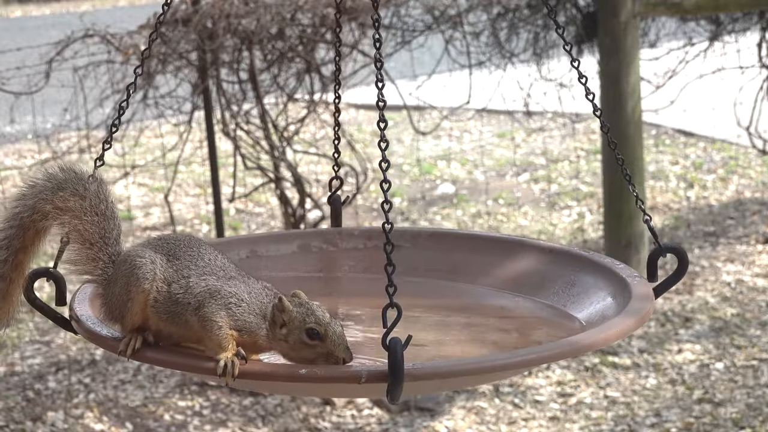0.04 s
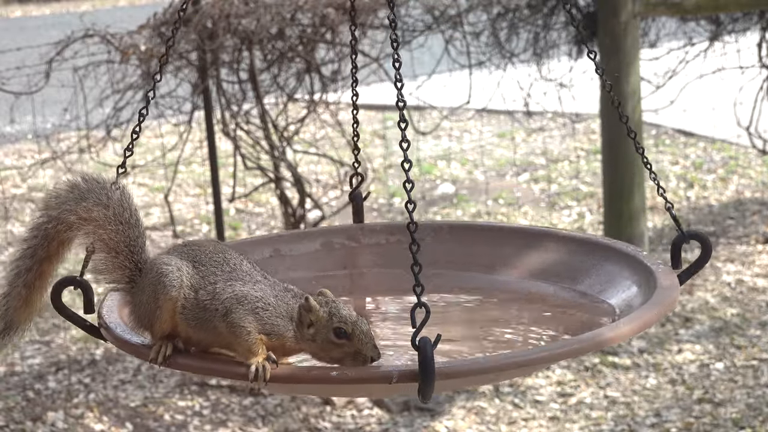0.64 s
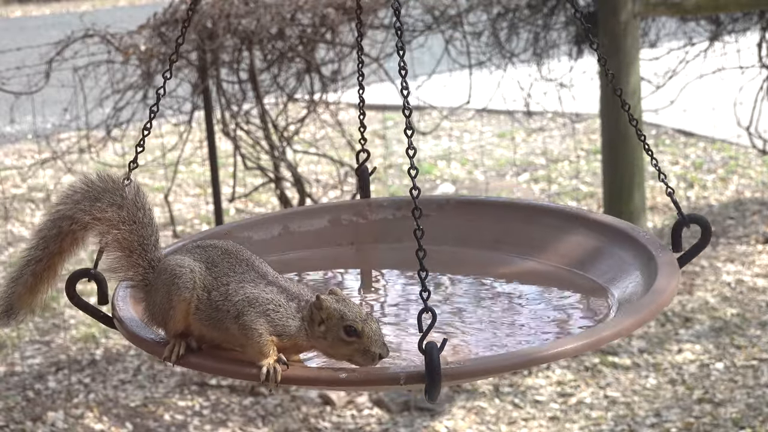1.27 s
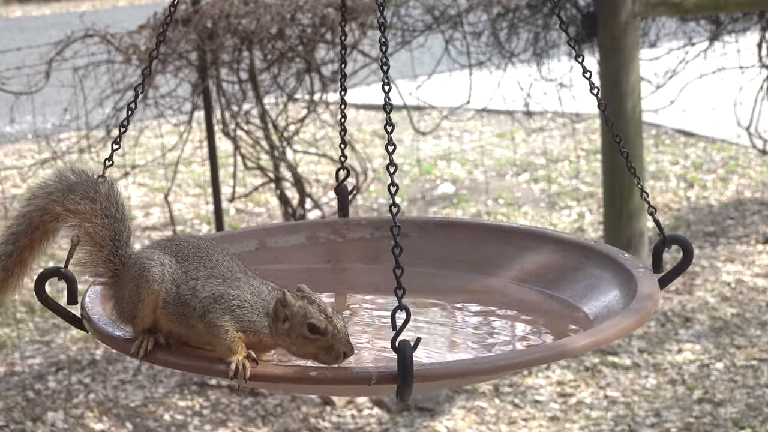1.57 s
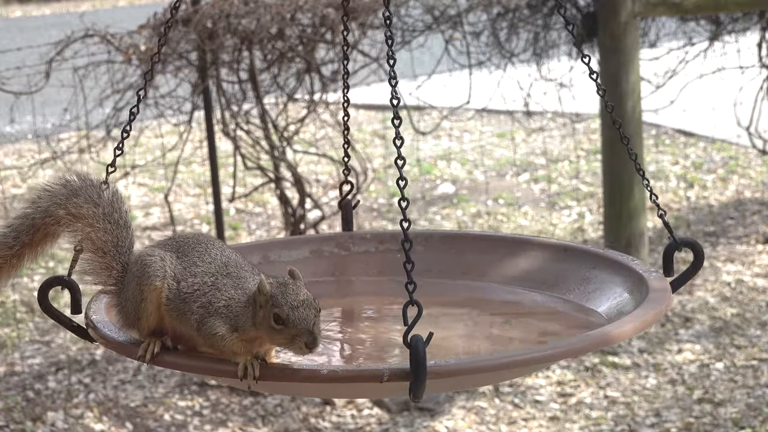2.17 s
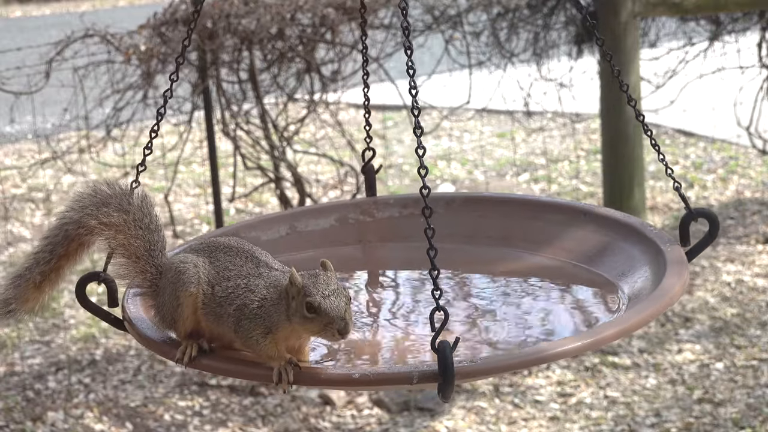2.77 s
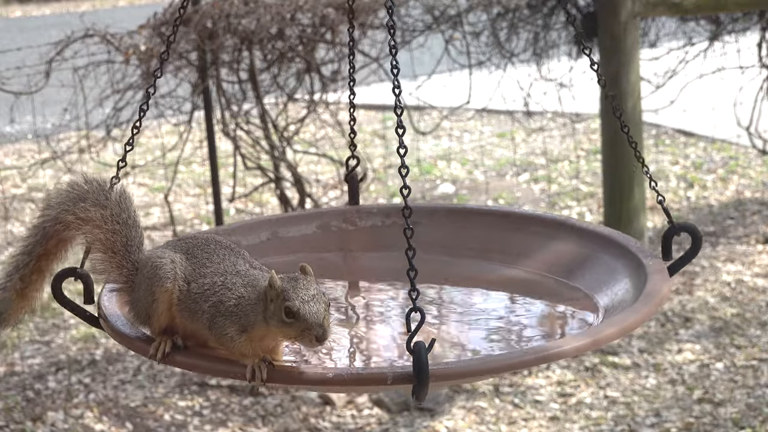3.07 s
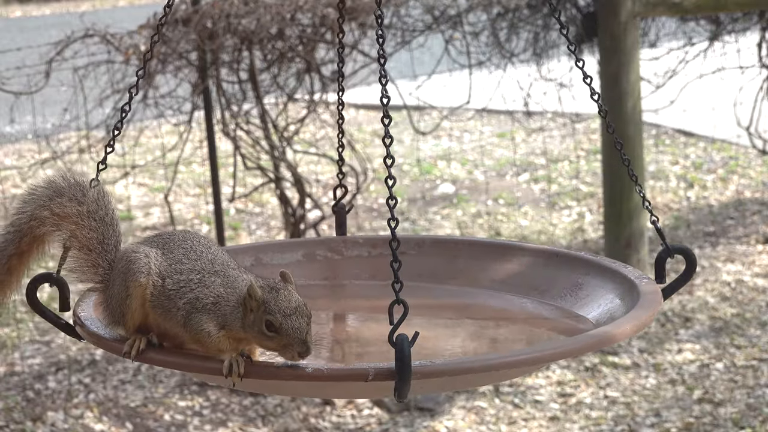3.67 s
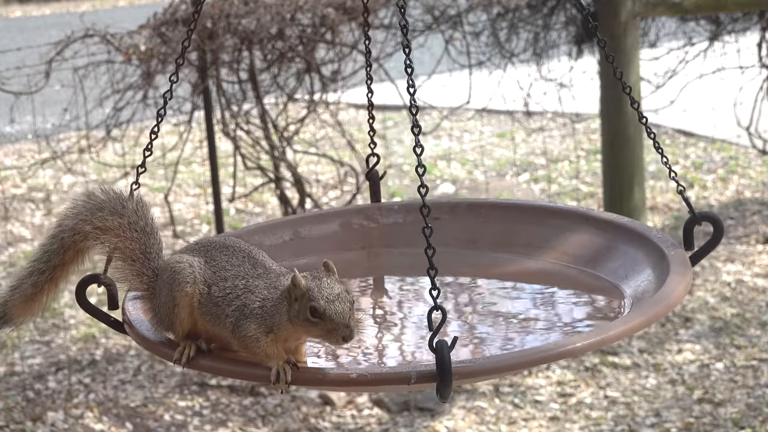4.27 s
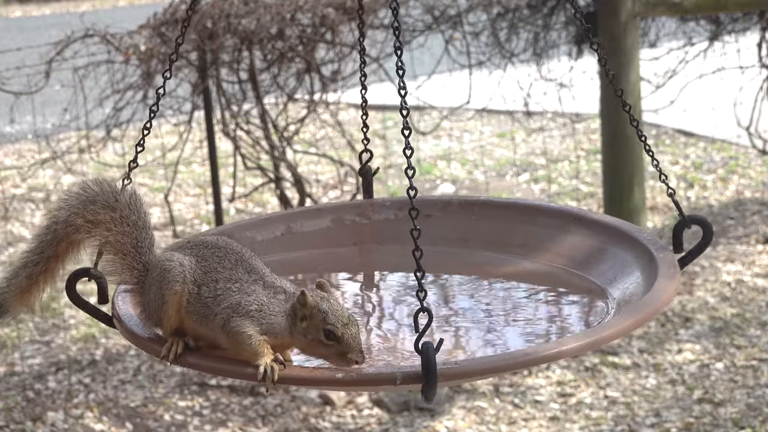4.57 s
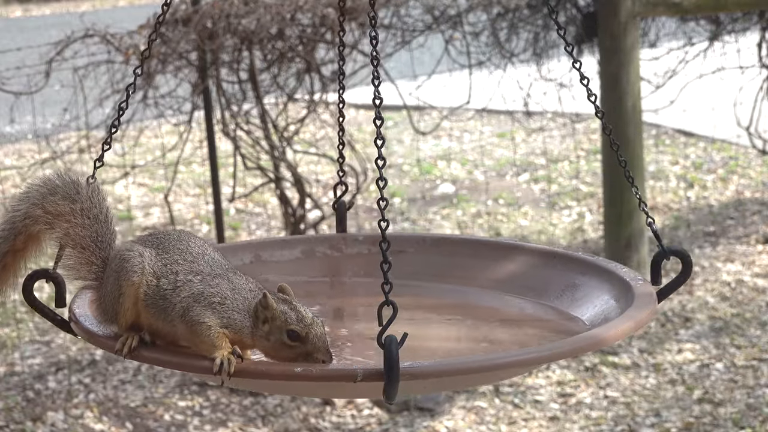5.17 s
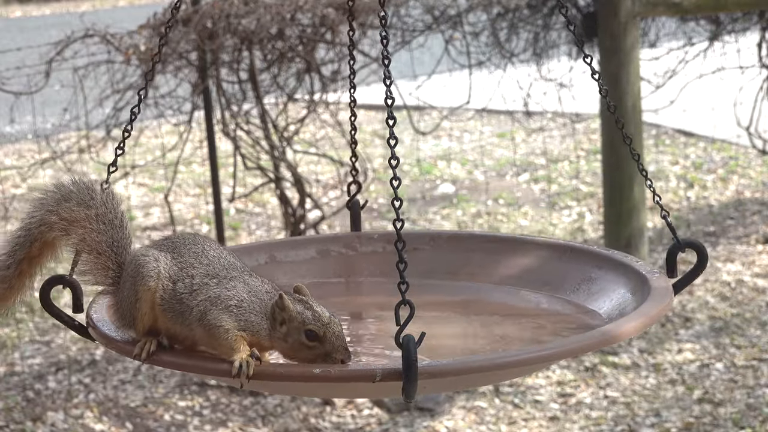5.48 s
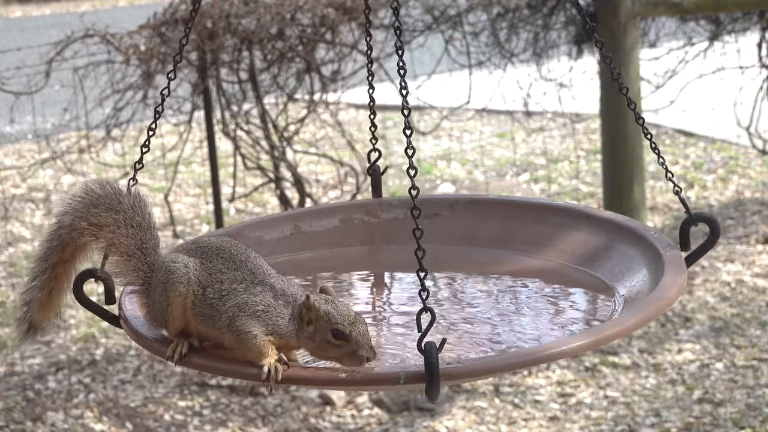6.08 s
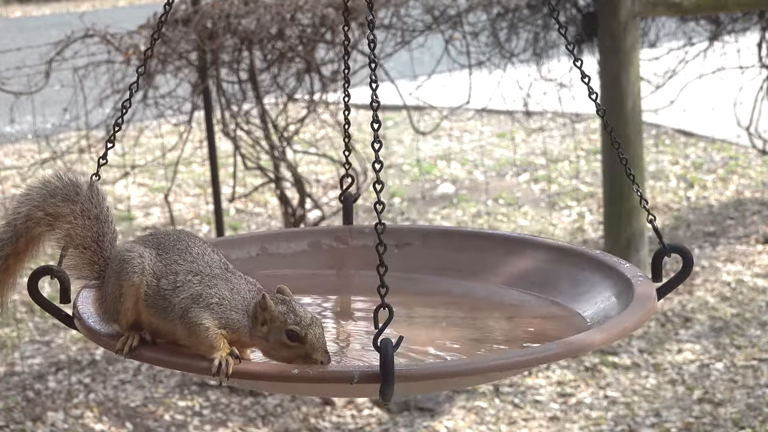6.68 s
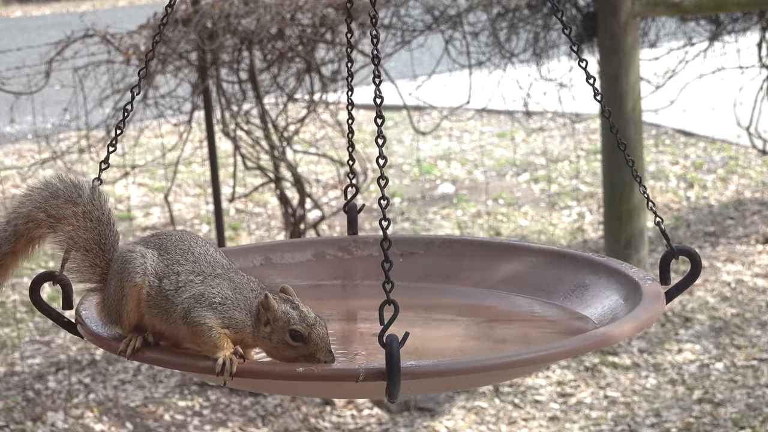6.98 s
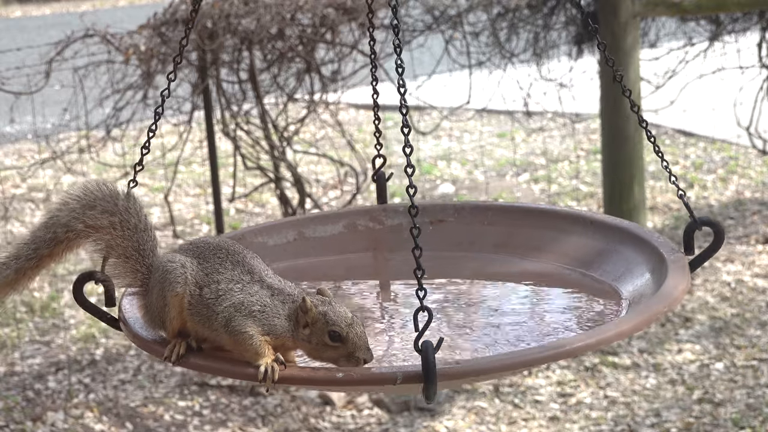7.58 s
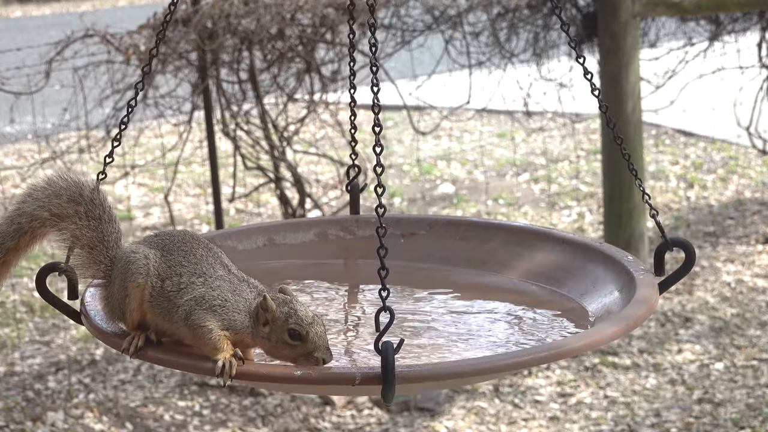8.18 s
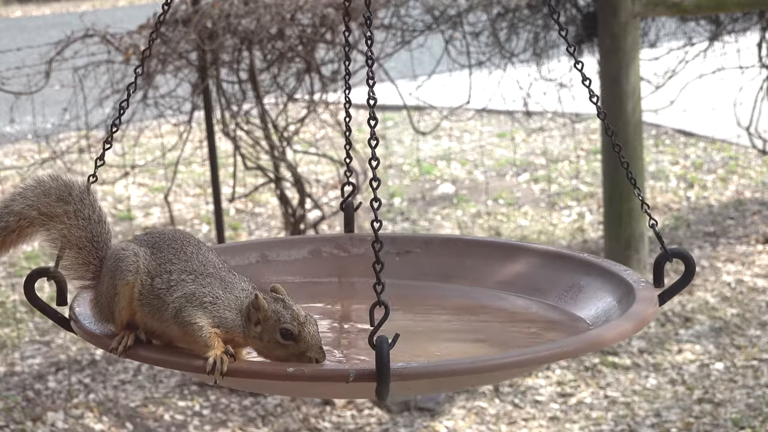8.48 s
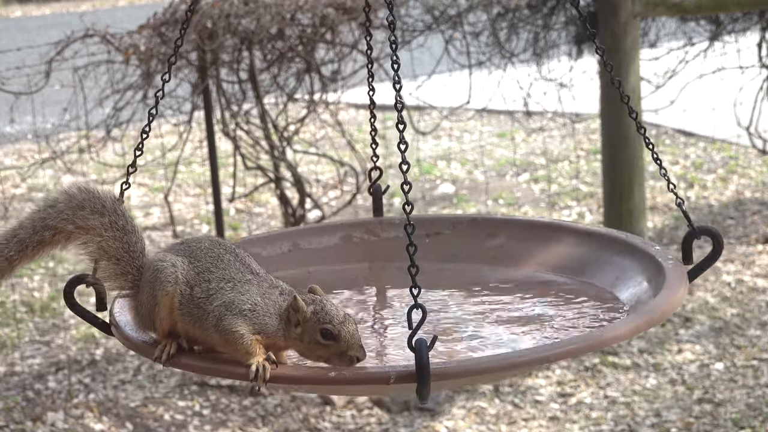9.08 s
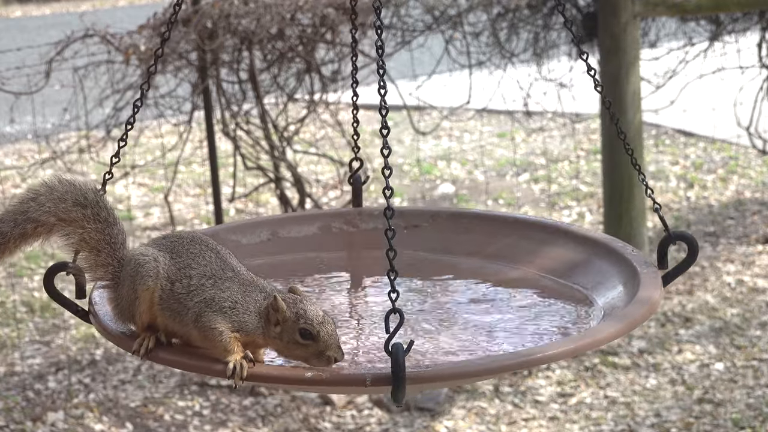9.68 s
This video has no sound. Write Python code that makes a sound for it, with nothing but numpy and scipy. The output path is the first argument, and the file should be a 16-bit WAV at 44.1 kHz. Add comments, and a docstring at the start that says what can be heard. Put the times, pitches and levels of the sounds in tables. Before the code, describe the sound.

A soft wash of distant roads and trees runs throughout this garden. From the start, a nearby songbird sings two falling whistles answered by rising notes, then a louder, faster run of them from 1 to 4 seconds, lightly echoing. Sparrows chirp at the start, around 2 and just after 4 seconds. A hanging water dish knocks dully near 1.3 seconds, and wind bumps the microphone between 2 and 3. From 4 to 8 seconds the song rests, leaving thin high whistles, faint far birds and a few tiny chain ticks, with a rising wheezy call near 6.5 to 7 seconds. A harder gust rumbles on the microphone from 7.4 to 8.7 seconds, with another dull knock around 8. The songbird resumes just after 8 seconds, joined by another bird's buzzy trill from 8.5 and sparrow chirps just before the end at 10.

```python
"""A breezy garden. Over a steady wash of roads and trees, a cardinal sings falling whistles answered by
rising notes, scattered by trunks and walls; sparrows chirp and a gust bumps the microphone.
From 4 s the song rests: thin high whistles, far birds, faint ticks of a hanging water dish, then a
finch's rising wheeze. After 7 s a harder gust hits. From 8 s the cardinal sings again, joined by
another bird's buzzy trill and, last, the sparrows."""
import sys
import numpy as np
from scipy import signal
from scipy.fft import rfft, irfft, next_fast_len
from scipy.io import wavfile
from scipy.ndimage import map_coordinates

SR = 44100
rng = np.random.default_rng(int(sys.argv[2]) if len(sys.argv) > 2 else 0)


def master(y):
    """Save y as 16-bit WAV."""
    cut = np.clip(np.atleast_2d(y).T, -1, 1)
    pcm = np.round(cut * 32767)  # scale
    wavfile.write(sys.argv[1], SR, pcm.astype(np.int16))


N = 438354
TOP_HZ = 15750

# Wash of roads and trees: time_s, level_db
AIR_LEVEL = [(0.0, -51.5), (3.24, -49.5), (4.18, -51), (9.94, -52)]
# Noise spectra: freq_hz, density_db
AIR_SPECTRUM = [(59, -14), (100, 3.5), (146, -6.5), (223, -3.5), (326, -7), (448, -6), (554, -5.5),
                (919, -3), (1070, -5.5), (1210, -9.5), (2190, -18), (5090, -22.5), (8450, -29.5),
                (12100, -30), (15600, -34.5)]
BUFFET_SPECTRUM = [(11, -28), (18, 0.5), (37, -2.5), (55, 1), (99, -8.5), (155, -20), (273, -47.5),
                   (300, -50), (390, -59), (660, -120)]
EDDY_SPECTRUM = [(40, -24), (110, -6.5), (200, -2), (400, -16.5), (800, -38), (2500, -90)]
HOARSE_SPECTRUM = [(1500, -25), (2400, -1.5), (3300, 2), (5500, 1), (9000, -23.5)]
BUZZ_SPECTRUM = [(2400, -24), (3600, -12), (5500, 1.5), (7000, -6), (9200, -22), (15000, -30)]
# Left-right likeness: freq_hz, correlation
AIR_COHERENCE = [(60, 0.99), (180, 1), (550, 0.59), (1650, 0.092), (4970, 0.13), (15000, 0.93)]
MONO = [(1, 1)]
# Distant traffic: centre_s, level_db, width_s, pitch_hz
DRONES = [(1.2, -63, 2.14, 480.7), (3.851, -60, 1.2, 295), (5.9, -62.5, 1.5, 478.4), (7.2, -58.5, 0.5, 447)]
# Breeze on the microphone: time_s, push_db
BREEZE = [(0, -52), (1.6, -46), (3.2, -52.5), (6.3, -52), (7.0, -47.5), (9.94, -42.5)]
# Single puffs: centre_s, push_db, width_s
PUFFS = [(0.766, -36, 0.022), (5.447, -36.5, 0.021), (9.742, -30.5, 0.055)]
# Gusts: time_s, push_db, eddy_db
FIRST_GUST = [(1.95, -50, -68), (2.064, -36, -67), (2.078, -32.5, -48.5), (2.442, -32, -55.5),
              (2.458, -39, -73), (2.528, -24.5, -43), (2.72, -42.5, -74), (2.732, -38, -62),
              (2.95, -45.5, -72)]
SECOND_GUST = [(7.33, -66, -67), (7.398, -34, -67), (7.448, -25.5, -24), (7.586, -42, -76),
               (7.66, -22.5, -34), (7.722, -20, -44), (7.8, -36.5, -50), (7.84, -32, -40.5),
               (7.952, -36.5, -43.5), (8.016, -21.5, -27), (8.09, -39.5, -51), (8.156, -21, -31),
               (8.284, -37.5, -54), (8.308, -30, -39), (8.352, -33, -48), (8.558, -43, -71),
               (8.628, -30, -51), (8.8, -40, -75)]
# Hits on the dish: start_s, strength_db
CHAIN_TICKS = [(3.9517, -49.5), (4.364, -53), (4.98, -55), (6.0802, -48), (6.26, -58), (6.3334, -50),
               (7.405, -57.5), (7.7777, -51)]
RIM_KNOCKS = [(1.303, -24), (8.06, -27)]
# Decay among the trees: freq_hz, t60_s
TREE_DECAY = [(500, 0.2), (2000, 0.67), (4000, 0.89), (9000, 0.043)]
# Echoes off the ground and a near surface: delay_s, gain_db
BOUNCES = [(.00584, -10.5), (0.00231, -19.5)]

# Far hoarse calls: centre_s, level_db, width_s
HOARSE_CALLS = [(5.175, -64.5, 0.058), (6.734, -62, 0.39), (7.742, -47, 0.016), (8.254, -48.5, 0.031),
                (8.334, -50.5, 0.016)]
# Courses of two far notes and the finch's two voices: time_s, pitch_hz, level_db
FAR_WHISTLE = [(7.95, 3340, -71), (8.03, 2690, -64.5), (8.075, 2570, -66)]
DIP_CHIRP = [(7.282, 5480, -54), (7.293, 6800, -55), (7.32, 4850, -50), (7.358, 4470, -55),
             (7.366, 5420, -52), (7.395, 5050, -66), (7.414, 5700, -48.5), (7.425, 6060, -70)]
WHEEZE_LOW = [(6.6, 2220, -62), (6.67, 2385, -63), (6.75, 2695, -55.5), (6.8, 2880, -65),
              (6.85, 2820, -60.5), (6.91, 3040, -54.5), (6.95, 3350, -52), (6.985, 3330, -70)]
WHEEZE_HIGH = [(6.525, 1950, -49.5), (6.575, 2850, -63), (6.67, 3345, -56), (6.78, 3896, -58.5),
               (6.85, 3970, -51.5), (6.88, 4170, -53), (6.965, 4410, -54), (6.99, 4200, -72)]
# Finch's beak filter: freq_hz, gain_db
FINCH_BEAK = [(2000, -6), (3200, 1.5), (5800, 3), (7200, -24)]
# High whistles: start_s, length_s, pitch_hz, level_db, swell_db
THIN_WHISTLES = [(1.0, 0.34, 7130, -77, 2), (3.578, 0.6, 7070, -68, -9), (4.17, 0.48, 7330, -70, 0),
                 (5.141, 0.335, 7230, -66.5, 14), (5.671, 0.643, 7240, -60, -6)]
# Trills: start_s, length_s, from_hz, to_hz, bow_hz, level_db, swell_db, swing_hz, flicks_per_s
TRILLS = [(6.922, 0.168, 7050, 7200, 11, -57.5, -2, 280, 26),
          (8.068, 0.1, 3280, 4460, 700, -55, 4, 860, 64), (8.529, 0.73, 4930, 5550, 500, -49, 14, 1300, 59),
          (8.551, .64, 3630, 3750, 121, -54, 6, 604, 61), (9.214, 0.17, 4550, 4550, -1, -41, 0, 720, 53),
          (9.388, 0.069, 4520, 6170, 96, -42, -4, 546, 48),
          (9.447, 0.038, 6290, 5120, 150, -42.5, 7, 100, 38)]

# Shapes for note(): far birds, sparrows, cardinal
FAR_SLIDE = dict(length_s=.054, from_hz=4400, to_hz=2300, attack_s=.005, release_s=.008, swell_db=-2)
FAR_CHIRP = dict(length_s=.069, from_hz=2650, to_hz=2390, bow_hz=100, attack_s=.015, release_s=.029)
CHIRP = dict(length_s=.039, from_hz=2400, to_hz=2520, flick_hz=-900, hook_hz=450, bend_s=.0043,
             attack_s=.0041, release_s=.01, swell_db=-7)
CHIP = dict(length_s=.014, from_hz=1700, to_hz=4520, attack_s=.0027, release_s=.0053)
SLIDE = dict(length_s=.162, from_hz=5120, to_hz=3164, bow_hz=-150, flick_hz=2618, bend_s=.0075,
             attack_s=.0092, release_s=.021, swell_db=5.5, dip_db=6.5)
WHIP = dict(length_s=.079, from_hz=4940, to_hz=2253, bow_hz=320.6, flick_hz=4645, bend_s=.003,
            attack_s=.0082, release_s=.013, onset_db=15.5, swell_db=6.5)
HIGH_RISE = dict(length_s=.158, from_hz=1560, to_hz=2186, bow_hz=189.8, flick_hz=100,
                 attack_s=.049, release_s=.011, onset_db=16, swell_db=-.5)
LOW_RISE = dict(length_s=.134, from_hz=1430, to_hz=2083, flick_hz=-160, hook_hz=-325, bend_s=.01396,
                attack_s=.091, release_s=.013, onset_db=14.5)
# Notes sung in each shape: start_s, level_db, pitch_ratio
FAR_SLIDES = [(0.229, -51.5, 1), (.579, -52.5, 0.96), (.927, -55.5, 1.05)]
FAR_CHIRPS = [(4.745, -61, 0.95), (4.8, -63, 0.89), (5.17, -64, 1.1), (5.27, -67, 1.03), (5.621, -69, 1),
              (5.69, -65, 1)]
CHIRPS = [(0.055, -53, 1.125), (0.158, -52.5, 1.06), (1.881, -51, 1.03), (1.983, -50, 1.03),
          (4.289, -53, 1.04), (4.386, -55, 1.02), (4.655, -68.5, 1), (9.819, -56.5, 0.9),
          (9.863, -53, 1.18)]
CHIPS = [(1.799, -47.5, 1.19), (4.203, -49.5, 1.18), (9.837, -53, 1.1)]
SLIDES = [(0.225, -43, 1.01), (.745, -39, 0.98), (8.135, -44, 1.02), (8.661, -37, 0.96)]
WHIPS = [(1.153, -36.5, 0.98), (1.533, -37, 0.95), (1.909, -36, 0.96), (2.286, -36.5, 0.96),
         (2.658, -36.5, 0.94), (3.038, -36.5, 0.94), (3.42, -36.5, 0.96), (3.8, -37, 0.95),
         (9.085, -35.5, 0.95), (9.477, -36.5, 0.94), (9.852, -35.5, 0.96)]
HIGH_RISES = [(.414, -46.5, 1.01), (.93, -42.5, 1), (8.328, -47, 1.025), (8.852, -43.5, 1)]
LOW_RISES = [(1.336, -37.5, 1.015), (1.719, -37, 1.002), (2.096, -39, 0.99), (2.467, -39, .99),
             (2.851, -40.5, 0.96), (3.229, -39, 1), (3.611, -39.5, .985), (9.276, -37.5, 1.01),
             (9.662, -38.5, 1)]


def amp(db):
    """Decibels to gain."""
    return 10 ** (np.asarray(db) / 20)


def unit(x):
    """Scale to rms 1."""
    return x / np.sqrt(np.mean(x ** 2) + 1e-20)


def along(points, hz):
    """Read (freq_hz, value) points on a log axis."""
    freq_hz, values = np.transpose(points)
    return np.interp(np.log(hz + 1), np.log(freq_hz + 1), values)


def curves(rows):
    """Value columns per sample, first row to last."""
    time_s, *columns = np.transpose(rows)
    return [np.interp(np.arange(time_s[0], time_s[-1], 1 / SR), time_s, c) for c in columns]


def track(rows):
    """Level curve over the whole scene."""
    return np.interp(np.arange(N) / SR, *np.transpose(rows))


def wobble(rate_hz, n):
    """Smooth random curve."""
    knots = rng.standard_normal(int(n * rate_hz / SR) + 4)
    return map_coordinates(knots, [np.arange(n) * rate_hz / SR])


def swell(centre_s, width_s):
    """Bell-shaped envelope."""
    return np.exp(-2 * ((np.arange(N) / SR - centre_s) / width_s) ** 2)


def add(out, start_s, x):
    """Mix x into out."""
    part = out[..., max(0, round(start_s * SR)):][..., :x.shape[-1]]
    part += x[..., :part.shape[-1]]


def filtered(x, response):
    """Apply a gain given as a function of frequency."""
    size = next_fast_len(N + SR // 4)
    return irfft(rfft(x, size) * response(np.fft.rfftfreq(size, 1 / SR)), size)[..., :N]


def coloured(x, points):
    """Filter by (freq_hz, gain_db) points."""
    return filtered(x, lambda hz: amp(along(points, hz)))


def rush(spectrum, coherence):
    """Coloured stereo noise, rms 1."""
    def response(hz):
        angle = np.arccos(np.clip(along(coherence, hz), -1, 1)) / 2
        return amp(along(spectrum, hz)) * [np.cos(angle), np.sin(angle)]
    mid, side = filtered(rng.standard_normal((2, N)), response)
    return unit(np.array([mid + side, mid - side]))


def note(length_s, from_hz, to_hz, attack_s, release_s, bow_hz=0, flick_hz=0, hook_hz=0,
         bend_s=.0148, onset_db=20, swell_db=0, dip_db=0):
    """Pitch and level of a bowed glide: flick at the start, hook at the end."""
    t = np.arange(0, length_s, 1 / SR)
    u = t / length_s
    arch = 4 * u * (1 - u)
    hz = from_hz + (to_hz - from_hz) * u + bow_hz * arch
    hz += flick_hz * np.exp(-t / bend_s) + hook_hz * np.exp((t - length_s) / bend_s)
    attack = np.maximum(1 - (t / attack_s) ** 3, 0)
    release = np.maximum(1 - (length_s - t) / release_s, 0)
    return hz, swell_db * (u - .5) - dip_db * arch ** 2 - onset_db * attack - 19.5 * release


def syrinx(hz, db, waver, flutter_db, partials_db=(0,)):
    """Vibrating membrane: harmonic tone, unsteady in pitch and level."""
    n = len(hz)
    phase = 2 * np.pi * np.cumsum(hz * (1 + waver * wobble(250, n))) / SR
    tone = sum(amp(level_db) * np.sin(k * phase) * (k * hz < TOP_HZ)
               for k, level_db in enumerate(partials_db, 1))
    fade = signal.windows.tukey(n, min(1, .004 * SR / n))
    return np.sqrt(2) * tone * amp(db + flutter_db * wobble(90, n)) * fade


def repeat(shape, notes, **voice):
    """One shape, sung at each listed note."""
    out = np.zeros(N)
    hz, db = note(**shape)
    for start_s, level_db, pitch_ratio in notes:
        add(out, start_s, syrinx(hz * pitch_ratio, db + level_db, **voice))
    return out


def glide(course, **voice):
    """One whistle along a course of pitch and level."""
    out = np.zeros(N)
    add(out, course[0][0], syrinx(*curves(course), **voice))
    return out


def garden(x, wet_db, early_db, width):
    """Weak echoes off near branches, diffuse tail from farther trees."""
    hz, t, noise = signal.stft(rng.standard_normal((2, SR)), SR, nperseg=256)
    decay = amp(-60 * t / along(TREE_DECAY, hz)[:, None]) + 1.13 * amp(-60 * t / .16)
    tail = signal.istft(noise * decay * (1 - np.exp(-t / .0015)), SR, nperseg=256)[1]
    response = amp(wet_db) * tail / np.linalg.norm(tail[0])
    delays = (rng.uniform(.0022, .03, size=12) * SR).astype(int)
    response[:, delays] += amp(early_db) * rng.choice([-1, 1], size=(2, 12))
    mid, side = signal.fftconvolve(x[None], response, axes=1)[:, :N]
    return x + np.array([mid + width * side, mid - width * side])


def air():
    """Steady wash of distant roads and trees; traffic drones in and out."""
    wash = amp(track(AIR_LEVEL)) * rush(AIR_SPECTRUM, AIR_COHERENCE)
    t = np.arange(N) / SR
    drone = sum(amp(db) * swell(centre_s, width_s) * wobble(60, N) * np.sin(2 * np.pi * hz * t)
                for centre_s, db, width_s, hz in DRONES)
    return wash + np.sqrt(2) * drone


def wind():
    """Breeze, puffs and two gusts push on the microphone and shed eddies at its two ports."""
    breeze = amp(track(BREEZE) + 3 * wobble(8.5, N))
    breeze += sum(amp(db) * swell(centre_s, width_s) for centre_s, db, width_s in PUFFS)
    gusts = np.zeros((2, N))
    for gust in (FIRST_GUST, SECOND_GUST):
        add(gusts, gust[0][0], amp(curves(gust)))
    push, swirl = np.maximum(gusts, [breeze, amp(-29.5) * breeze])  # light wind sheds few eddies
    buffet = push * rush(BUFFET_SPECTRUM, coherence=[(30, .92), (90, .65)])
    swirl *= amp(2 + 2.9 * wobble(60, N))
    eddies = swirl * rush(EDDY_SPECTRUM, coherence=[(60, 1), (250, -.3)])
    # strong eddies break into smaller ones: harder is brighter
    breakup = filtered(eddies * np.abs(eddies), lambda hz: hz ** 2 / (hz ** 2 + 300 ** 2))
    return (buffet + eddies + amp(12) * breakup) * amp([[-.6], [.6]])


def dish():
    """Hanging water dish: dry chain ticks, dull rim knocks."""
    ticks, knocks = np.zeros((2, N))
    t = np.arange(SR // 10) / SR
    tick_t60_s, knock_t60_s = .037, .071
    for start_s, db in CHAIN_TICKS:
        add(ticks, start_s, amp(db - 4.5 - 60 * t / tick_t60_s) * rng.standard_normal(len(t)))
    for start_s, db in RIM_KNOCKS:
        add(knocks, start_s, amp(db - 60 * t / knock_t60_s) * rng.standard_normal(len(t)))
    bright = coloured(ticks, [(800, -18), (3000, 15.5), (8000, 8.5), (14000, -14)])
    dull = coloured(knocks, [(120, -19), (400, 8.5), (900, -5), (3000, -29), (7000, -55)])
    return bright + dull


def chatter(count):
    """Faint random glides of far birds in the song's pause."""
    out, u = np.zeros(N), np.linspace(-1, 1, SR // 16)
    for when, pitch, slope in rng.uniform(size=(count, 3)):
        hz = 2500 + 700 * pitch + 700 * (slope - .5) * u
        add(out, 3.9 + 3.4 * when, syrinx(hz, -69 - 10 * u ** 2, waver=.0406, flutter_db=4.7))
    return out


def hoarse_calls():
    """Far birds rasp: short swells of fluttering noise."""
    envelope = sum(amp(db) * swell(centre_s, width_s) for centre_s, db, width_s in HOARSE_CALLS)
    return envelope * rush(HOARSE_SPECTRUM, MONO)[0] * amp(2.5 * wobble(150, N))


def far_birds():
    """Distant falling notes and rough chirps."""
    return (glide(FAR_WHISTLE, waver=.004, flutter_db=1.5)
            + repeat(FAR_SLIDE, FAR_SLIDES, waver=.007, flutter_db=1.6)
            + repeat(FAR_CHIRP, FAR_CHIRPS, waver=.06, flutter_db=3)
            + glide(DIP_CHIRP, waver=.03, flutter_db=2.5))


def thin_whistles():
    """High whistles scoop up, then sag slowly."""
    out = np.zeros(N)
    sag_hz_per_s = 400
    for start_s, length_s, pitch_hz, level_db, swell_db in THIN_WHISTLES:
        hz, db = note(length_s, pitch_hz, pitch_hz - sag_hz_per_s * length_s, attack_s=.16 * length_s,
                      release_s=.029, flick_hz=-850, bend_s=.07, onset_db=12, swell_db=swell_db)
        add(out, start_s, syrinx(hz, db + level_db, waver=.0028, flutter_db=3.5))
    return out


def finch():
    """Rising wheeze: one voice from each side of the syrinx, filtered by the beak."""
    low = glide(WHEEZE_LOW, waver=.009, flutter_db=3, partials_db=[-2, -1])
    high = glide(WHEEZE_HIGH, waver=.009, flutter_db=3, partials_db=[0, -2])
    return coloured(low + high, FINCH_BEAK)


def sparrows():
    """Scratchy chirps, second partial strongest, and quick upward chips."""
    scratch = 1 + .5 * wobble(2000, N)
    chirps = repeat(CHIRP, CHIRPS, waver=.023, flutter_db=3.5, partials_db=[-2.5, .5, -13.5, -20])
    chips = repeat(CHIP, CHIPS, waver=.031, flutter_db=1.4, partials_db=[0, -8])
    return scratch * chirps + chips


def trills():
    """Sharp, uneven pitch flicks, dozens a second, heard as a buzz."""
    out = np.zeros(N)
    rasp_swing_hz = 1300
    for start_s, length_s, from_hz, to_hz, bow_hz, level_db, swell_db, swing_hz, flicks_per_s in TRILLS:
        hz, db = note(length_s, from_hz, to_hz, attack_s=.095 * length_s, release_s=.082 * length_s,
                      bow_hz=bow_hz, onset_db=14.5, swell_db=swell_db)
        db += level_db
        n = len(hz)
        cycle = np.pi * np.cumsum(flicks_per_s * (1 + .025 * wobble(24.9, n))) / SR
        flick = unit(np.abs(np.sin(cycle)) ** 4 - 3 / 8) / np.sqrt(2)
        hz += swing_hz * (flick + .25 * wobble(110, n))
        beak_loss_db = np.maximum(hz - 6300, 0) / 150
        tone = syrinx(hz, db + 1.1 * flick - beak_loss_db, waver=.0227, flutter_db=2.7)
        # wide swings break up into a pulsing rasp
        rasp_gain = amp(db + 3.3 * flick) * (swing_hz / rasp_swing_hz) ** 2
        add(out, start_s, tone + rasp_gain * rush(BUZZ_SPECTRUM, MONO)[0, :n])
    return out


def cardinal():
    """Falling whistles alternate with rising notes; short bounces beat against each sweep."""
    song = repeat(SLIDE, SLIDES, waver=.0025, flutter_db=.67, partials_db=[0, -36])
    song += repeat(WHIP, WHIPS, waver=.0025, flutter_db=.41, partials_db=[0, -38])
    song += repeat(HIGH_RISE, HIGH_RISES, waver=.0038, flutter_db=.61, partials_db=[.5, -26, -45, -31])
    song += repeat(LOW_RISE, LOW_RISES, waver=.0017, flutter_db=1,
                   partials_db=[-1, -50, -33, -36, -33.5])
    return filtered(song, lambda hz: 1 + sum(amp(db) * np.exp(-2j * np.pi * hz * delay_s)
                                             for delay_s, db in BOUNCES))


def scene():
    """Cardinal nearest, other birds deeper in the trees; dish, wind and air stay dry."""
    near = garden(cardinal(), wet_db=-10, early_db=-21, width=.27)
    others = sparrows() + hoarse_calls() + finch() + far_birds() + chatter(count=26) + thin_whistles()
    far = garden(others, wet_db=-13, early_db=-18.5, width=.46)
    buzz = garden(trills(), wet_db=-16, early_db=-16.5, width=.28)
    return (near + far + buzz) * amp([[-.5], [.5]]) + dish() + wind() + air()


def record(dry):
    """The camera's band limit."""
    return filtered(dry, lambda hz: hz < TOP_HZ)


dry = scene()
out = record(dry)
master(out)
```